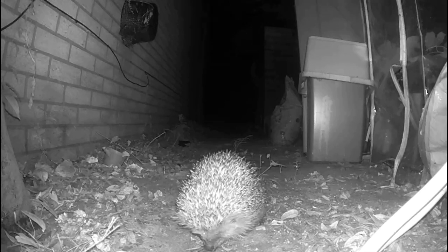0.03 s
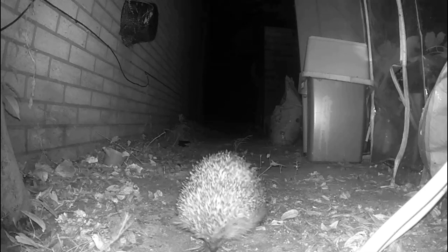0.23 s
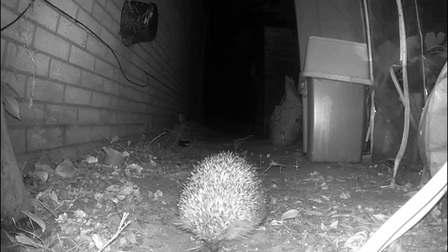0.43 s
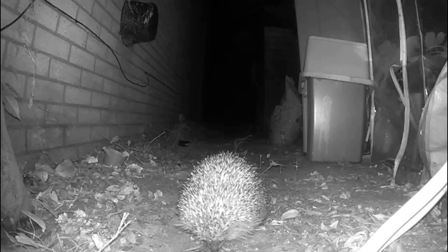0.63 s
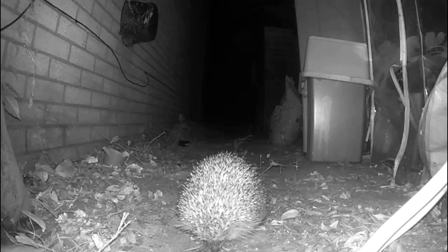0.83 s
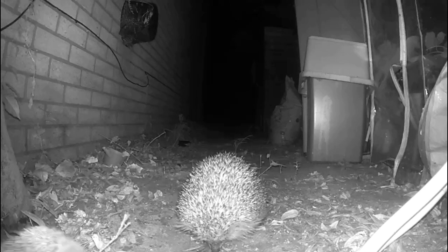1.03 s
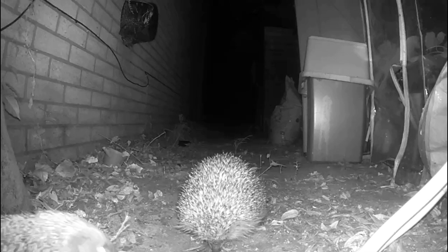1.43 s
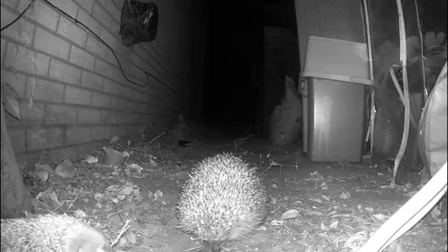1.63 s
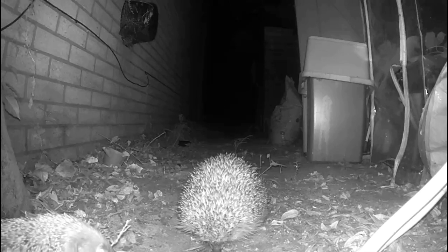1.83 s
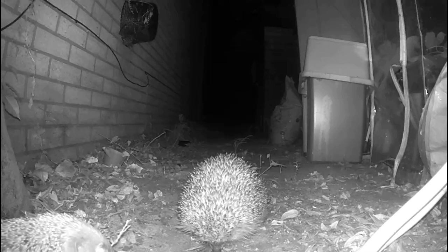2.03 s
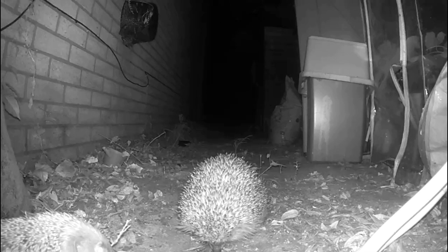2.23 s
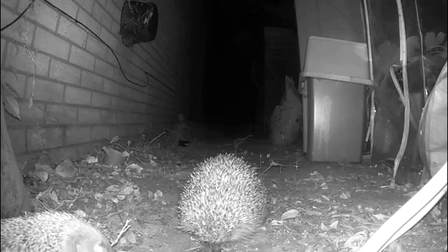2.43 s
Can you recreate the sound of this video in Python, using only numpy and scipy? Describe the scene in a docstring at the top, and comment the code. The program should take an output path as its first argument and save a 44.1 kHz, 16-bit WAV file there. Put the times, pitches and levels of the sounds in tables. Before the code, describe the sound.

A hedgehog rustles through dry leaves at night, right against the microphone. It moves in three short bouts, with hollow rubbing on the casing, low rumble, small snaps and one early thump, then settles into steady hiss.

```python
"""In dry leaf litter at night, a hedgehog pushes past a camera in three bouts of movement.
Sliding friction makes spines and leaves scrape, tiny impacts crackle, and stalks snap now and then.
The rubbing drives the resonances of the camera's case, jostling makes it rumble, and one bump thumps it.
Faint short pips come and go over a steady hiss."""
import sys
import numpy as np
from scipy import signal
from scipy.fft import rfft, irfft, next_fast_len
from scipy.io import wavfile
from scipy.ndimage import uniform_filter1d, map_coordinates

SR = 44100
rng = np.random.default_rng(int(sys.argv[2]) if len(sys.argv) > 2 else 0)


def unload_audio(sound):
    """Save the sound as a 16-bit wav file, at the path given as the first command line argument."""
    columns = np.transpose(np.atleast_2d(sound))
    # keep every value between -1 and 1, then stretch to whole-number steps
    steps = np.round(np.clip(columns, -1, 1) * 32767)
    wavfile.write(sys.argv[1], SR, steps.astype(np.int16))


N = 114660

# spectrum of the steady background (frequency [Hz], relative density [dB])
HISS_SPECTRUM = [(10, -1.5), (25, 2), (55, -4), (120, -13.5), (200, -12), (330, -15), (600, -19),
                 (1300, -22), (2200, -21), (3500, -24), (7000, -23.5), (9000, -24.5), (11000, -52)]
# faint pips (time [s], peak level [dB], pitch [Hz])
PIP_EVENTS = [(.012, -66, 2390), (.074, -65.5, 2390), (0.477, -56.5, 2127), (.543, -65, 2160),
              (.592, -59, 2350), (.604, -62.5, 2340), (.962, -63, 2240), (1.816, -69, 2450),
              (1.873, -63.5, 2450), (1.937, -66, 2190), (1.988, -67, 2400), (2.073, -63.5, 2310),
              (2.124, -64.5, 2093), (2.201, -68, 2400), (2.260, -66.5, 2230), (2.400, -67.5, 2100),
              (2.517, -68, 2300), (2.567, -69, 2300)]
# rumble of the jostled case, in consecutive curves (time [s], relative level [dB])
JOSTLE_LEVELS = [
    [(0.0, -50), (0.014, -54), (0.102, -74), (0.156, -71), (0.252, -41.5), (0.284, -57), (0.29, -45)],
    [(0.36, -42.5), (0.59, -61.5), (0.608, -66), (0.642, -68), (0.712, -56), (0.968, -60), (0.98, -81)],
    [(1.0, -73), (1.088, -40), (1.244, -47), (1.434, -51.5), (1.612, -54.5), (1.688, -49.5), (1.742, -62),
     (2.0, -67.5)],
]
# spectrum of that rumble (frequency [Hz], relative density [dB])
JOSTLE_SPECTRUM = [(12, -33.5), (25, -8), (55, 3.5), (72, 0.5), (95, -25), (160, -47.5), (400, -100)]
# rubbing on the case, in consecutive curves (time [s], relative level [dB])
RUB_LEVELS = [
    [(0.0, -62.5), (0.058, -61), (0.1, -73), (0.122, -59.5), (0.228, -40.5), (0.246, -46.5), (0.3, -41.5)],
    [(0.345, -44), (0.367, -43.5), (0.417, -43), (0.519, -67), (0.545, -53.5), (0.595, -82), (0.62, -73)],
    [(0.64, -60), (0.658, -54), (0.7, -50.5), (0.754, -59), (0.794, -55), (0.866, -63.5), (0.972, -60),
     (1.0, -59)],
    [(1.02, -51), (1.072, -44), (1.104, -43), (1.136, -42.5), (1.204, -43), (1.234, -49), (1.29, -45),
     (1.4, -51)],
    [(1.41, -49.5), (1.432, -45.5), (1.464, -59.5), (1.492, -52), (1.794, -63), (1.836, -72), (1.988, -82),
     (2.0, -65)],
]
# resonances of the rubbed case (frequency [Hz], bandwidth [Hz], relative gain [dB])
CASE_RESONANCES = [(115.3, 25.4, 1), (225, 19.9, 4), (252, 24.7, -3.5), (322.7, 10, -9.5), (395.5, 52, -15),
                   (800, 37, -18.5), (850, 53, -21), (1603, 17, -21.5), (2034, 37, -23)]
# modes of the bumped case (frequency [Hz], relative level [dB], 60 dB decay time [s])
RING_MODES = [(45, -4, 0.11), (242, -13, 0.031), (480, -8, 0.0091), (710, -2.5, 0.0094),
              (1000, -19.5, 0.0063)]
# snapping stalks and leaf edges (time [s], peak level [dB], pitch [Hz], 60 dB decay time [s])
SNAP_EVENTS = [(.0352, -50.5, 5300, 0.0084), (0.1706, -44, 3400, 0.007), (0.288, -36, 5530, 0.0059),
               (0.2894, -36.5, 2270, .012), (0.2944, -36, 2060, 0.028), (0.2934, -36.5, 5430, .014),
               (0.319, -35, 4600, .006), (0.349, -30.5, 5200, 0.0037), (0.3813, -39, 6260, 0.012),
               (0.4422, -45.5, 4300, 0.0054), (.5190, -56, 4800, .006), (0.6974, -48, 5530, 0.0084),
               (.7420, -39, 5400, 0.0044), (0.7503, -33.5, 3560, 0.0036), (.7780, -40, 4840, 0.0022),
               (.7820, -39, 4200, 0.0047), (.7854, -35.5, 6000, .004), (.8390, -43.5, 5700, 0.01),
               (0.8718, -44, 5140, 0.0073), (.892, -48.5, 5100, 0.023), (1.237, -59, 3800, 0.006),
               (1.3333, -26, 6500, 0.0049), (1.3423, -44.5, 1990, 0.012), (1.3615, -43, 2600, 0.0073),
               (1.3668, -45, 3900, .010), (1.42, -48.5, 3970, .012), (1.6668, -46, 4900, 0.013),
               (1.7285, -47, 5000, 0.0053), (2.448, -55.5, 5770, 0.013)]
# rustle of the leaves, in consecutive curves (time [s], relative level [dB])
RUSTLE_LEVELS = [
    [(0.1, -74), (0.144, -70.5), (0.166, -59.5), (0.25, -58.5), (0.286, -45), (0.372, -53), (0.38, -49),
     (0.508, -73), (0.518, -70), (0.562, -80), (0.6, -76)],
    [(0.6, -73), (0.704, -60.5), (0.72, -62), (0.748, -55.5), (0.766, -58), (0.78, -49.5), (0.828, -60.5),
     (0.84, -57), (0.854, -67.5), (0.89, -53.5), (0.948, -79.5), (0.96, -75)],
    [(0.96, -74), (0.992, -70), (1.0, -64.5), (1.092, -55), (1.22, -58), (1.236, -51), (1.248, -57),
     (1.32, -65)],
    [(1.35, -58.5), (1.368, -61), (1.376, -65.5), (1.41, -64.5), (1.42, -59), (1.43, -67), (1.522, -56.5),
     (1.61, -65.5), (1.692, -55.5), (1.864, -85), (1.876, -71), (1.9, -95)],
]
# spectrum of that rustle (frequency [Hz], relative density [dB])
LEAF_SPECTRUM = [(300, -17), (560, -17), (790, 1), (1000, -3), (1350, -10), (1600, -8.5), (1800, -2.5),
                 (2100, 1), (2500, -4), (3600, 0), (5500, 4), (7000, 2.5), (9000, -1)]
# treble roll-off of the microphone (frequency [Hz], gain [dB])
MIC_RESPONSE = [(7000, -0.5), (7600, -4), (8100, -11), (8600, -18), (9000, -33.5)]

BAND_LIMIT_HZ = 9100


def amp(db):
    """Amplitude ratio of a level in decibels."""
    return 10 ** (np.asarray(db) / 20)


def unit(x):
    """Normalisation to rms 1."""
    return x / np.sqrt(np.mean(x ** 2) + 1e-20)


def decay(t, t60):
    """Exponential damping: the amplitude falls 60 dB by t = t60."""
    return np.exp(-np.log(1000) * t / t60)


def gain_at(points, hz):
    """Gain interpolated from (frequency [Hz], level [dB]) points on a logarithmic frequency axis."""
    freqs, db = np.transpose(points)
    return amp(np.interp(np.log(hz + 1), np.log(freqs + 1), db))


def envelope(curves):
    """Gain per sample from consecutive (time [s], level [dB]) curves."""
    times, db = np.vstack(curves).T
    return amp(np.interp(np.arange(N) / SR, times, db, right=-100))


def wobble(rate_hz):
    """Smooth random modulation: a spline through rate_hz Gaussian values a second."""
    knots = rng.standard_normal(int(N * rate_hz / SR) + 4)
    return map_coordinates(knots, [np.arange(N) * rate_hz / SR])


def filtered(x, response):
    """Linear filtering: the spectrum of x is multiplied by a frequency response."""
    size = next_fast_len(len(x) + 8192)
    return irfft(rfft(x, size) * response(np.fft.rfftfreq(size, 1 / SR)), size)[:len(x)]


def coloured(x, spectrum):
    """Spectral shaping of x, normalised to rms 1."""
    return unit(filtered(x, lambda hz: gain_at(spectrum, hz)))


def add(track, start_s, sound):
    """Superposition of a sound on the track."""
    part = track[max(round(start_s * SR), 0):][:len(sound)]
    part += sound[:len(part)]


def hiss():
    """Stationary noise: microphone hiss over a low night-time rumble."""
    return amp(-65.5) * coloured(rng.standard_normal(N), HISS_SPECTRUM)


def pips(rise_s=0.0032, relative_bandwidth=0.13):
    """Phase diffusion broadens each faint, soft-edged tone into a pip of narrow-band noise."""
    track, t = np.zeros(N), np.arange(SR // 20) / SR
    swell = t / rise_s * np.exp(1 - t / rise_s)
    for start_s, db, hz in PIP_EVENTS:
        phase_step = np.sqrt(2 * np.pi * relative_bandwidth * hz / SR)
        drift = phase_step * np.cumsum(rng.standard_normal(len(t)))
        tone = np.sin(2 * np.pi * hz * t + uniform_filter1d(drift, size=8))
        add(track, start_s, amp(db) * swell * tone)
    return track


def jostling():
    """Forced vibration: the whole case shakes at low frequency while the animal leans on it."""
    return amp(-4) * envelope(JOSTLE_LEVELS) * coloured(rng.standard_normal(N), JOSTLE_SPECTRUM)


def rubbing(roughness_db=1.5):
    """Stick-slip friction drives the resonances of the case, each a damped oscillator."""
    def case_response(hz):
        # neighbouring modes alternate in polarity
        return sum((-1) ** k * amp(db) * 1j * hz * width / (centre ** 2 - hz ** 2 + 1j * hz * width)
                   for k, (centre, width, db) in enumerate(CASE_RESONANCES))

    friction = rng.standard_normal(N) * amp(roughness_db * wobble(rate_hz=45))
    return amp(-0.5) * envelope(RUB_LEVELS) * unit(filtered(friction, case_response))


def bump(start_s=0.3122, push_s=0.013, rise_s=0.00022):
    """Impact excitation: a soft body shoves the case there and back, and its damped modes ring dully."""
    track, t = np.zeros(N), np.arange(SR // 5) / SR
    push = np.sin(2 * np.pi * np.minimum(t / push_s, 1))
    ring = sum(amp(db) * np.sin(2 * np.pi * hz * t) * decay(t, t60) for hz, db, t60 in RING_MODES)
    attack = 1 - np.exp(-t / rise_s)
    add(track, start_s, -amp(-25) * attack * (push + ring))
    return track


def snaps(typical_t60_s=0.0085, width_octaves=0.29, crack_gain=0.19):
    """Brittle fracture gives a pitched burst and a broad crack; the shorter it is, the wider its band."""
    track, t = np.zeros(N), np.arange(SR // 20) / SR
    for start_s, db, pitch, t60 in SNAP_EVENTS:
        sharpness = np.sqrt(typical_t60_s / t60)

        def spectrum(hz):
            octaves = np.log2((hz + 1) / pitch)
            band = np.exp(-0.5 * (octaves / (width_octaves * sharpness)) ** 4)
            crack = crack_gain * sharpness * np.minimum(hz / pitch, 1) * (hz < BAND_LIMIT_HZ)
            return band + crack

        noise = filtered(rng.standard_normal(len(t)), spectrum)
        burst = np.cos(np.angle(signal.hilbert(noise)))  # phase alone, so the amplitude is constant
        add(track, start_s, amp(db) * burst * decay(t, t60))
    return track


def spine_ticks(per_second=1500, ring_cycles=4.4):
    """Shot noise: spines flick over dry leaves at random times, each impact a tiny damped sinusoid."""
    count = int(per_second * N / SR)
    when, pitch, polarity = rng.random((3, count, 1))
    hz = 5070 * 2 ** (2 * pitch - 1.2)  # spread over two octaves
    offsets = np.arange(160)
    cycles = hz * offsets / SR
    ticks = np.sign(polarity - 0.5) * np.sin(2 * np.pi * cycles) * decay(cycles, ring_cycles)
    positions = (when * N).astype(int) + offsets
    return np.bincount(positions.ravel(), ticks.ravel(), N)[:N]


def rustle(flutter_db=3.1):
    """Sliding friction and small impacts excite the leaves: a fluttering scrape with crackle on top."""
    scrape = coloured(rng.standard_normal(N), LEAF_SPECTRUM)
    flutter = amp(flutter_db * wobble(rate_hz=120))
    crackle = coloured(spine_ticks(), LEAF_SPECTRUM)
    return envelope(RUSTLE_LEVELS) * (amp(0.5) * flutter * scrape + amp(-3.5) * crackle)


def scene():
    """Superposition of all sources in one channel, close and without reverberation."""
    return (hiss() + rubbing() + jostling() + bump() + snaps() + pips() + rustle())[None]


def record(dry, noise_top_hz=15800):
    """Band limiting: the camera cuts the treble steeply; only a faint hiss lies above it."""
    sound = filtered(dry[0], lambda hz: gain_at(MIC_RESPONSE, hz) * (hz < BAND_LIMIT_HZ))
    faint_hiss = amp(-98.5) * rng.standard_normal(N)
    return filtered(sound + faint_hiss, lambda hz: hz < noise_top_hz)[None]


dry = scene()
out = record(dry)
unload_audio(out)
```